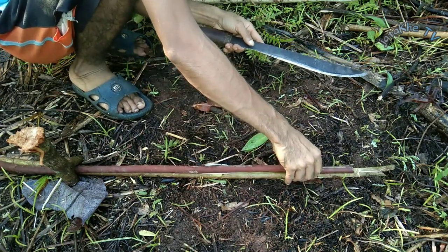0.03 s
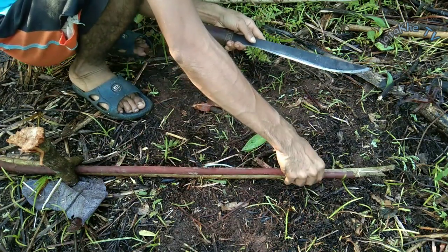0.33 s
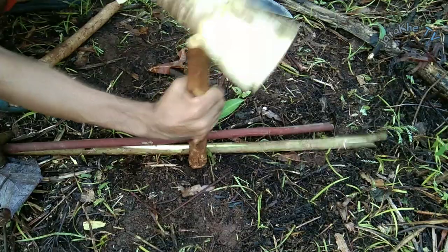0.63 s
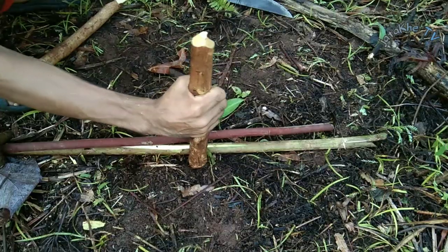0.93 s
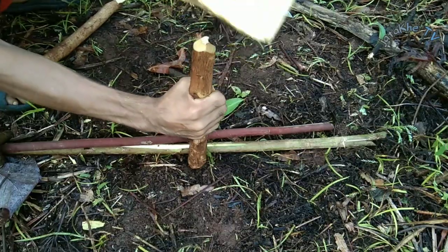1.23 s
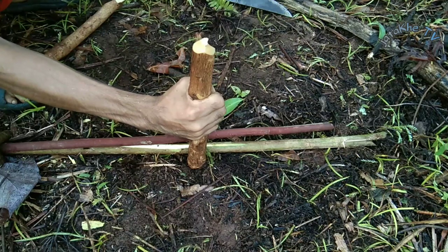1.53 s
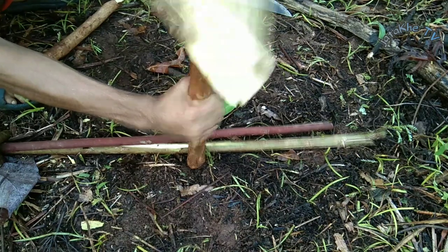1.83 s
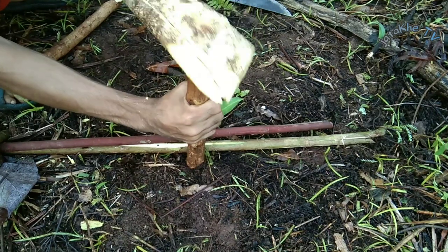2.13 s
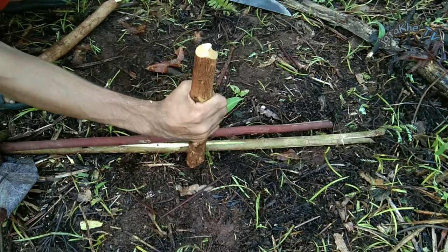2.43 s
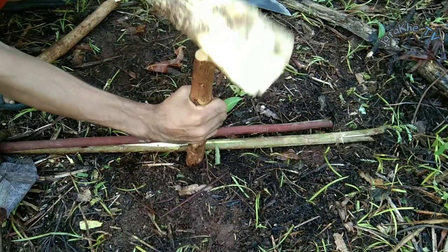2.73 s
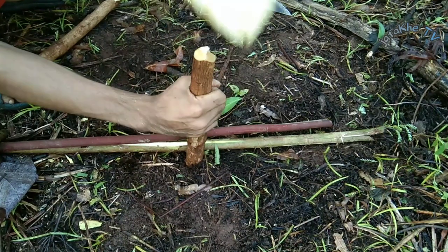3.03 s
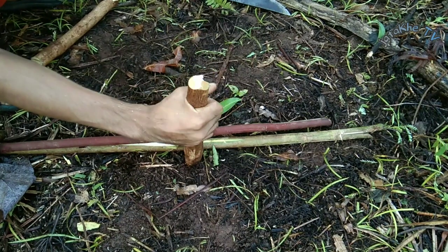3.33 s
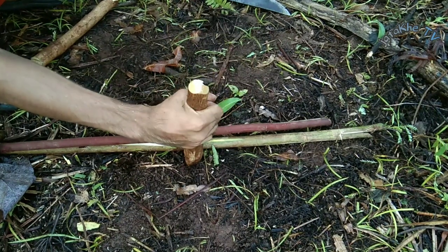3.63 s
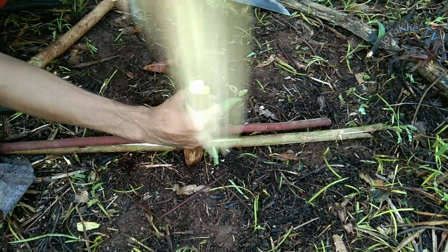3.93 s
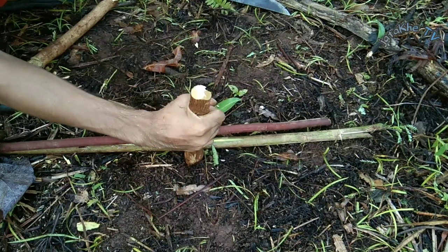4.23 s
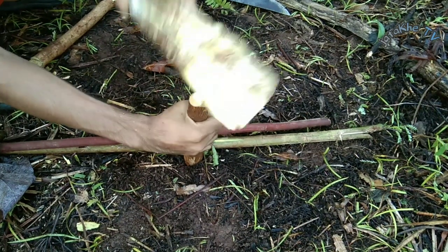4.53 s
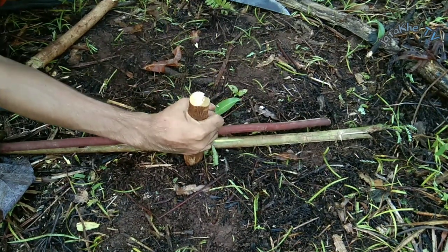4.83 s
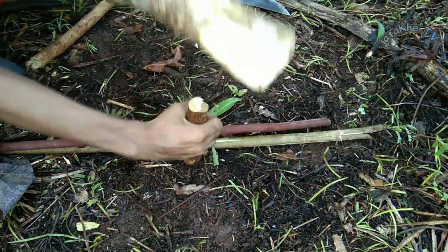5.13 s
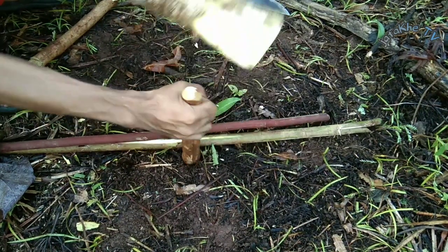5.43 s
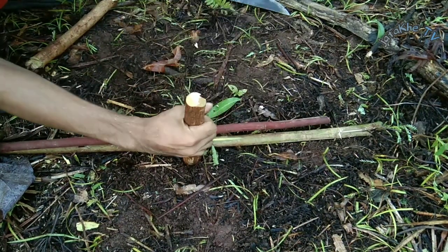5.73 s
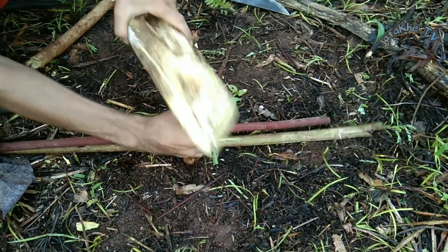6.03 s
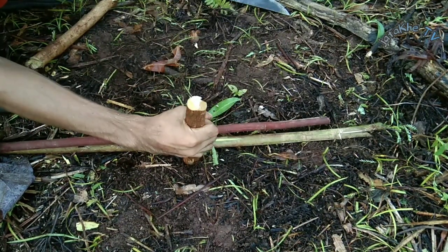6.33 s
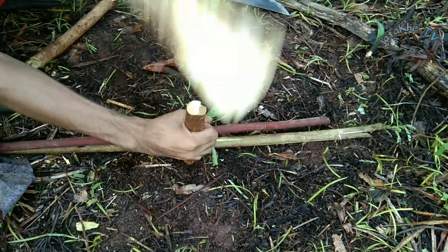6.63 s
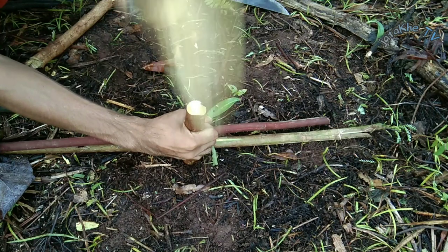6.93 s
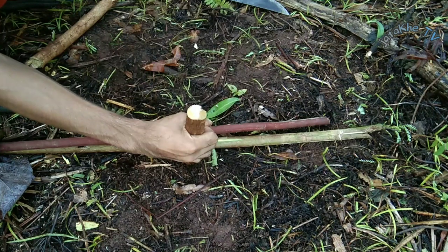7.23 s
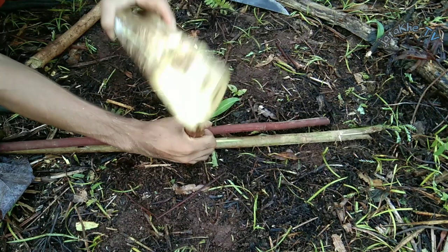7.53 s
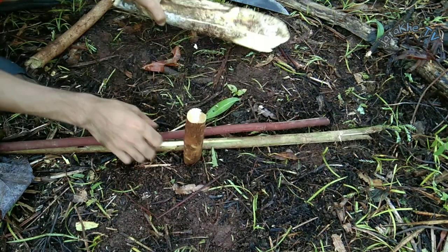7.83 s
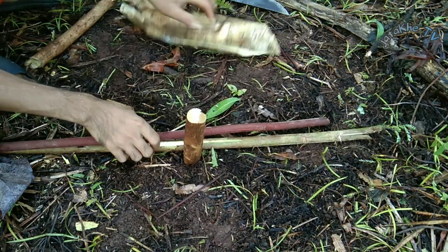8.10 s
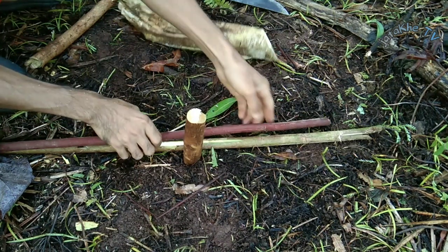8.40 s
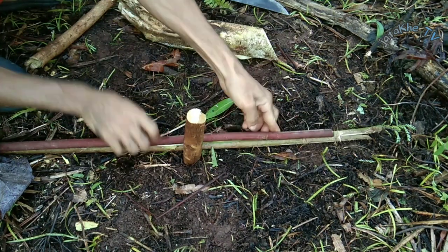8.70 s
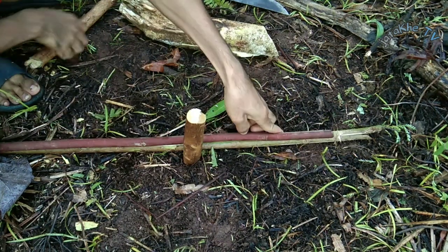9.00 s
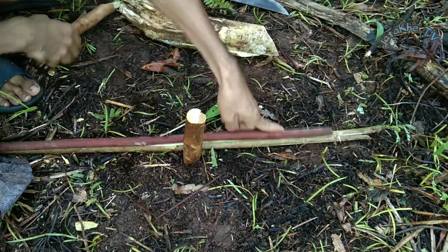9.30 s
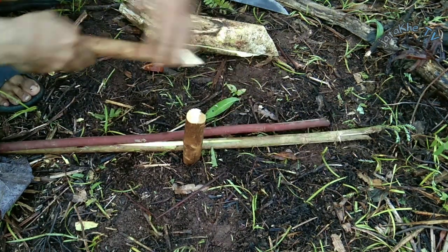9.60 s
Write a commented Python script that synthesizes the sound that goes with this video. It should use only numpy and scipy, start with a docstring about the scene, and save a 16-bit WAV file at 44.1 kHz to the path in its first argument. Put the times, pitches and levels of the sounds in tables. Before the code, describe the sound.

Crickets chirr softly in still outdoor air and a few far birds whistle. Close by, a heavy piece of wood strikes a wooden stake, each blow a crisp knock with a dull thud and a brief echo. Four spaced blows lead into two quicker runs of four. The hammering stops, leaving faint bird calls, a short high trill and a light clack of sticks on the ground.

```python
"""Crickets chirp and rasp by wing strokes at a forest edge; a few birds whistle and sticks are nudged.
Then a heavy billet of wood drives a hand-held stake into damp soil. Each impact thuds through the
ground, excites the billet's modes and cracks fibres off the stake's top; three times, early on, the
billet drops back softly. The stake grips and the blows go on. After the last, far birds chatter,
an insect pips, and the billet and some sticks are moved on the ground."""
import sys
import numpy as np
from scipy import signal
from scipy.fft import rfft, irfft, next_fast_len
from scipy.io import wavfile
from scipy.ndimage import map_coordinates

SR = 44100
rng = np.random.default_rng(int(sys.argv[2]) if len(sys.argv) > 2 else 0)


def wav_out(sig):
    """Save sig, one row per channel (or a flat mono array), as 16-bit PCM at SR to the path in sys.argv[1]."""
    wavfile.write(sys.argv[1], SR, np.round(np.clip(np.atleast_2d(sig).T, -1, 1) * 32767).astype(np.int16))


N = 426006
T = np.arange(N) / SR

# still forest air: frequency_hz, density_db
AIR_SPECTRUM = [(25, -11.5), (60, -6), (110, -3.5), (200, -8.5), (450, -13.5), (1000, -16.5), (3500, -20.5),
                (9000, -19.5), (10000, -14.5), (11500, -23.5), (16000, -25.5)]
# kinds of distant cricket: pitch_hz, width_hz, level_db, flicker_db
CHORUS_BANDS = [(6160, 68, -86.5, 4), (6490, 110, -77.5, 6.5), (6950, 310, -80, 1.5), (7140, 92, -75, 3.5),
                (7607, 160, -77, 8.5), (6900, 1800, -79.5, 0), (9930, 990, -88, 2.5)]
# bouts of the bush crickets: start_s, end_s, level_db
RASP_BOUTS = [(-.1, .636, -66), (.656, 1.14, -79.5), (1.71, 3.097, -76), (3.374, 4.51, -77),
              (4.671, 5.98, -76), (5.983, 6.7, -82.5), (6.987, 8.49, -73.5), (9.031, 9.45, -80.5),
              (9.46, 9.8, -69)]
# the three nearest crickets: pitch_hz
CRICKET_PITCHES = [6080, 6470, 7635]
# their chirps: length_s, rate_hz, level_db
CRICKET_SONGS = [(.07, 13, -72), (.085, 8.2, -68), (0.026, 5.3, -66)]
# their phrases, one list per cricket: start_s, end_s
CRICKET_PHRASES = [
    [(.38, 1.45), (2.3, 3.6), (5.2, 5.55), (8.31, 8.48), (8.82, 9.1)],
    [(.68, 1.7), (2.0, 2.8), (3.15, 8.0), (8.35, 9.1), (9.38, 9.66)],
    [(0, 1.6), (2.05, 11)],
]
# single bird whistles: start_s, pitch_hz, level_db
BIRD_WHISTLES = [(0, 3340, -67.5), (.09, 2510, -69), (.2, 2355, -70.5), (.68, 3080, -83),
                 (1.057, 2120, -75), (2.64, 3010, -76), (4.95, 2500, -77), (7.49, 3030, -74.5),
                 (7.88, 3040, -78.5), (7.96, 1993, -74), (8.129, 1880, -78), (8.29, 2780, -79)]
# thin, high bird trills: start_s, pitch_hz, level_db
BIRD_TRILLS = [(5.52, 5535, -67), (8.177, 8470, -50), (8.525, 7860, -67)]

# dull bumps on the soil: start_s, length_s, level_db
SOIL_THUDS = [(.05, 1, -79.5), (.531, 0.049, -71.5), (8.045, .13, -62.5)]
# sticks knocking together, or the loose stake against the poles: start_s, length_s, level_db
STICK_CLACKS = [(0.536, 0.049, -86.5), (1.513, .07, -69.5), (2.292, 0.089, -66), (3.035, .07, -65),
                (8.051, .08, -76), (9.476, 0.043, -64.5), (9.504, 0.082, -67)]
# dry litter snapping: start_s, length_s, level_db
LITTER_TICKS = [(1.039, 0.015, -53), (5.562, .05, -84)]
# spectra of thud, clack and tick: frequency_hz, density_db
THUD_SPECTRUM = [(40, 2), (90, 3), (170, -9), (300, -16), (600, -32), (1500, -55)]
CLACK_SPECTRUM = [(90, -20), (200, 6), (300, 16), (420, 2), (600, -8), (1000, -0.5), (1400, -5),
                  (2050, 4.5), (2600, -15), (3200, 3), (4100, -26), (5400, -10), (9000, -21)]
TICK_SPECTRUM = [(2500, -15), (5500, -18), (8500, 4), (11000, -10), (15000, -16)]
# modes of the hollow poles lying against the stake: pitch_hz, gain_db, t60_s
POLE_MODES = [(316.4, -1, .2), (2070, -3, 0.2), (3030, -3, 0.21), (3720, -10, 0.26)]

# billet on stake: start_s, force_db, brightness_db, knock_db
IMPACTS = [(0.7894, 0, -2, -15.5), (1.2315, -0.5, -3, 12), (1.512, -8.5, -47, 19.5), (2.0149, -2, 1.5, 3),
           (2.292, -6, -33.5, 25), (2.7914, 1.5, 2, 9), (3.0348, -6.5, -34, -8.5), (3.6304, 1, 2.5, -1.5),
           (4.131, 1, 0.5, -1.5), (4.6217, 1, 2.5, 3), (5.1298, -1, 3, 4.5), (6.198, 0, -1.5, -5.5),
           (6.6761, 0, -1, 1.5), (7.148, 0, -1, -1), (7.6141, 2.5, -4, 4)]
# registers of soil, stake thump, hollow knock, billet ring and crack: low_hz, high_hz
REGISTER_BANDS = [(100, 180), (200, 680), (720, 1100), (1150, 2200), (2400, 16000)]
# each register's response with a loose or firm stake: loose_db, firm_db, brightness_share
REGISTER_RESPONSE = [(-41.5, -35, -.15), (-25, -25, 0), (-28, -27, .3), (-30, -22, 0.52), (-24, -24, 1)]
# modes of soil, stake and billet together: pitch_hz, gain_db, t60_s
IMPACT_MODES = [(92.88, 6.5, .06), (200, -3.5, .028), (345, 7, 0.02), (450, 12, 0.022), (630, 11, .015),
                (858, 3.5, 0.05), (867, 14, 0.01), (1270, 10.5, 0.0094), (1640, 10, .026),
                (1700, 0.5, 0.013), (1705, -26.5, 0.28), (2020, -5, 0.037), (2330, -4.5, .022),
                (2750, -9.5, 0.036), (3470, -10, .018), (4600, -4.5, 0.0053), (7400, -5, 0.01),
                (8530, -0.5, .018)]
# fibres crushed at the contact: frequency_hz, density_db
CRACK_SPECTRUM = [(300, -25.5), (1000, 2.5), (2000, 4), (3100, -3), (4500, 3), (5700, -6), (7800, -0.5),
                  (9000, -10), (10500, -14.5), (15500, -33.5)]
# scattering of a blow by the nearby ground and by the trees: frequency_hz, gain_db
GROUND_SCATTER = [(40, -14.5), (90, -3), (300, -15.5), (700, -13.5), (880, -9), (1100, -15), (1450, -13.5),
                  (1660, -7), (2000, -15.5), (3200, -10), (5500, -8), (7500, -1), (10000, -14),
                  (15500, -32)]
TREE_SCATTER = [(40, -15), (90, 1.5), (170, -8.5), (300, -10.5), (600, -8.5), (880, -8), (1300, -8.5),
                (1700, -4), (2300, -6.5), (3300, -8), (5500, 1), (7500, 3), (10000, -12), (15500, -33.5)]
# an insect's short pips: start_s, level_db
INSECT_PIPS = [(8.88, -62), (8.968, -53.5), (9.158, -55.5)]


def from_db(db):
    """Amplitude grows tenfold for every 20 dB."""
    return 10 ** (np.asarray(db) / 20)


def add(out, start_s, sound):
    """Superposition: a sound adds to the track from its start time on."""
    i = min(max(0, round(start_s * SR)), N)
    out[i:i + len(sound)] += sound[:N - i]


def coloured(x, spectrum):
    """Spectral shaping: gains interpolated over log frequency filter a signal; rms 1."""
    size = next_fast_len(len(x))
    hz, db = np.transpose(spectrum)
    bin_hz = np.maximum(np.fft.rfftfreq(size, 1 / SR), 1)
    gain = from_db(np.interp(np.log(bin_hz), np.log(hz), db))
    shaped = irfft(rfft(x, size) * gain, size)[:len(x)]
    return shaped / np.sqrt(np.mean(shaped ** 2) + 1e-20)


def drift(rate_hz, size=N):
    """Slow random modulation: a spline joins normal values drawn at the given rate."""
    steps = np.arange(size) / SR * rate_hz
    knots = rng.standard_normal(int(steps[-1]) + 4)
    return map_coordinates(knots, [steps + 1], order=2, mode="nearest")


def soft_onset(t, rise_s):
    """A finite rise time: amplitude builds smoothly from 0 to 1."""
    return 1 - np.exp(-(t / rise_s) ** 2)


def still_air(level_db=-86.5):
    """Broadband noise, densest in the bass, forms a steady floor."""
    return from_db(level_db) * coloured(rng.standard_normal(N), AIR_SPECTRUM)


def voices(hz, width_hz):
    """Incoherent addition: many insects on one pitch give a tone of random amplitude and phase."""
    phase = 2 * np.pi * hz * T
    return drift(width_hz) * np.cos(phase) + drift(width_hz) * np.sin(phase)


def far_crickets():
    """Each kind of cricket merges into a narrow band of noise whose level flickers."""
    return sum(from_db(db + flicker_db * drift(26)) * voices(hz, width_hz)
               for hz, width_hz, db, flicker_db in CHORUS_BANDS)


def bush_crickets(edge_s=0.022, wing_hz=118, depth=0.14, floor_db=-94, flutter_db=3.5):
    """Stridulation: fast wing strokes modulate broad rasps that come in bouts and flutter."""
    singing = sum(from_db(db) * (np.tanh((T - start) / edge_s) - np.tanh((T - end) / edge_s)) / 2
                  for start, end, db in RASP_BOUTS)
    upper = from_db(floor_db) + singing
    lower = from_db(-5) * upper
    strokes = 1 + depth * np.sin(2 * np.pi * np.cumsum(wing_hz + 6 * drift(4.2)) / SR)
    rasps = [lower * voices(hz=4307, width_hz=290) / 2, lower * voices(hz=4560, width_hz=350),
             upper * voices(hz=4890, width_hz=230), upper * voices(hz=5217, width_hz=300)]
    return strokes * sum(rasp * from_db(flutter_db * drift(22) - 1.5) for rasp in rasps)


def note(hz, length_s, sag, warble, warble_hz=160):
    """Frequency modulation: a tone swells and fades, sagging and warbling by shares of its pitch."""
    progress = np.linspace(0, 1, int(length_s * SR))
    pitch_hz = hz * (1 - sag * progress + warble * drift(warble_hz, size=len(progress)))
    return np.sin(np.pi * progress) * np.sin(2 * np.pi * np.cumsum(pitch_hz) / SR)


def near_crickets(wing_hz=48, depth=0.24, uneven_db=1.5, stumble=.2):
    """Amplitude modulation: wing strokes pulse a nearly pure tone in loosely timed chirps."""
    out = np.zeros(N)
    for hz, (length_s, rate_hz, db), phrases in zip(CRICKET_PITCHES, CRICKET_SONGS, CRICKET_PHRASES):
        for start_s, end_s in phrases:
            for beat_s in np.arange(start_s, end_s - length_s, 1 / rate_hz):
                late, louder, phase = rng.standard_normal(3)
                chirp = note(hz, length_s, sag=0, warble=0.0062, warble_hz=83)
                strokes = 1 + depth * np.sin(2 * np.pi * (wing_hz * T[:len(chirp)] + phase))
                gain = from_db(db + uneven_db * louder)
                add(out, beat_s + stumble * late / rate_hz, gain * strokes * chirp)
    return out


def birds(series_start_s=6.875, step_s=.261, series_hz=2435, peak_s=8.3, peak_db=-69, fade_db_per_s=8.5):
    """Gliding tones: falling whistles, single or in a series that swells and fades, and high trills."""
    out = np.zeros(N)
    beats_s = series_start_s + step_s * np.arange(10)
    series = [(s, series_hz, peak_db - fade_db_per_s * abs(s - peak_s)) for s in beats_s]
    for start_s, hz, db in BIRD_WHISTLES + series:
        add(out, start_s, from_db(db) * note(hz, length_s=0.069, sag=0.029, warble=.017))
    for start_s, hz, db in BIRD_TRILLS:
        add(out, start_s, from_db(db) * note(hz, length_s=.13, sag=.005, warble=0.031))
    return out


def forest_reverb(x, t60_s, rise_s):
    """Reverberation among trees: a call is convolved with decaying noise of unit energy."""
    t = np.arange(int(SR * 2 / 3)) / SR
    tail = rng.standard_normal(len(t)) * soft_onset(t, rise_s) * from_db(-60 * t / t60_s)
    return signal.oaconvolve(x, tail / np.sqrt(np.sum(tail ** 2)))[:N]


def handling(grain_db=4):
    """Brief contacts radiate grainy, decaying noise: thuds, clacks and dry ticks."""
    out, t = np.zeros(N), np.arange(int(SR / 3)) / SR
    kinds = (SOIL_THUDS, THUD_SPECTRUM), (STICK_CLACKS, CLACK_SPECTRUM), (LITTER_TICKS, TICK_SPECTRUM)
    for events, spectrum in kinds:
        for start_s, length_s, db in events:
            grains = from_db(grain_db * drift(230, size=len(t)))
            envelope = from_db(db) * soft_onset(t, rise_s=0.0012) * np.exp(-2 * t / length_s)
            add(out, start_s, envelope * grains * coloured(rng.standard_normal(len(t)), spectrum))
    return out


def poles(coupling_db=-2, uneven_db=2):
    """Free vibration: each clack leaves the hollow poles ringing faintly in their damped modes."""
    out, t = np.zeros(N), np.arange(int(SR / 3)) / SR
    for start_s, _, clack_db in STICK_CLACKS:
        for hz, db, t60_s in POLE_MODES:
            level_db = clack_db + coupling_db + db + uneven_db * rng.standard_normal()
            add(out, start_s, from_db(level_db - 60 * t / t60_s) * np.sin(2 * np.pi * hz * t))
    return out


def blow_levels(force_db, bright_db, knock_db, grip):
    """Excitation: force lifts all registers, hard contact the high ones, grip mainly soil and ring."""
    loose_db, firm_db, share = np.transpose(REGISTER_RESPONSE)
    soil, thump, knock, ring, snap = loose_db + grip * (firm_db - loose_db) + force_db + share * bright_db
    return [soil, thump, knock + knock_db, ring, snap]


def blow(levels_db, grip, hard_contact_s=.00095, soft_contact_s=0.0027, detune=0.017):
    """Modal impact: the push drives low modes; high ones ring and fibres crack as the billet rebounds."""
    t = np.arange(int(SR / 5)) / SR
    slack = 1 - grip  # a loose stake sounds lower and rings less
    rebound_s = .0015 + 0.001 * slack
    pushed, rung = np.zeros((2, len(t)))
    for hz, db, t60_s in IMPACT_MODES:
        drive_db = np.interp(hz, np.ravel(REGISTER_BANDS), np.repeat(levels_db, 2))
        gain = from_db(drive_db + db - 0.4 * rng.standard_normal())
        is_stake, is_billet = 150 < hz < 700, hz > 1100
        pitch_hz = hz * (1 - 0.057 * slack * is_stake) * (1 + detune * rng.standard_normal())
        age_s = np.maximum(t - rebound_s * is_billet, 0)
        decay = from_db(-60 * age_s / (t60_s * (1 - 0.1 * slack)))
        mode = gain * decay * np.cos(2 * np.pi * pitch_hz * age_s)
        if is_billet:
            rung += mode * soft_onset(age_s, rise_s=0.00026)
        else:
            pushed += mode
    # a blow without a crack is a slow contact, whose longer force pulse is a lower low-pass
    crack_db = levels_db[-1]
    contact_s = np.interp(crack_db, [-55, -35], [soft_contact_s, hard_contact_s])
    force = np.sin(np.pi * np.minimum(t / contact_s, 1)) ** 2
    pushed = signal.fftconvolve(pushed, force / force.sum())[:len(t)]
    fibres = crack(np.maximum(t - rebound_s / 2, 0))
    return pushed + rung + from_db(crack_db) * fibres


def crack(t, rise_s=.003, fall_s=0.004, grain_db=0.5, gain_db=-4.5):
    """Fracture: snapping fibres merge into a short burst of broadband noise."""
    snaps = rng.standard_normal(len(t)) * from_db(grain_db * drift(2500, size=len(t)))
    burst = coloured(snaps, CRACK_SPECTRUM) * soft_onset(t, rise_s) * np.exp(-t / fall_s)
    rms_over_30_ms = np.sqrt(np.sum(burst ** 2) / (.03 * SR))
    return from_db(gain_db) * burst / rms_over_30_ms


def soil_rebound(soil_db, start_hz=108, end_hz=70, sink_s=.018, rise_s=.013, t60_s=0.081, gain_db=7):
    """Elastic recovery: the soil springs back in a damped wave whose pitch sinks as it settles."""
    t = np.arange(int(SR / 4)) / SR
    pitch_hz = end_hz + (start_hz - end_hz) * np.exp(-t / sink_s)
    envelope = from_db(soil_db + gain_db - 60 * t / t60_s) * soft_onset(t, rise_s)
    return envelope * np.cos(2 * np.pi * np.cumsum(pitch_hz) / SR)


def echoes(levels_db, scatter, t60_s, rise_s, gain_db):
    """Diffuse scattering: litter, leaves and trunks return a smooth tail in the blow's colour."""
    t = np.arange(int(SR * 2 / 3)) / SR
    log_hz = np.log(np.maximum(np.fft.rfftfreq(len(t), 1 / SR), 1))
    hz, db = np.transpose(scatter)
    density_db = np.array(levels_db) - 10 * np.log10(np.ptp(REGISTER_BANDS, axis=1) / (SR / 2))
    log_centres = np.log(REGISTER_BANDS).mean(axis=1)
    scattered = [0, 1, 3, 4]  # the brief knock is heard only directly
    blow_db = np.interp(log_hz, log_centres[scattered], density_db[scattered])
    colour = from_db(blow_db + np.interp(log_hz, np.log(hz), db) + gain_db)
    tail = irfft(rfft(rng.standard_normal(len(t))) * colour, len(t))
    return tail * soft_onset(t, rise_s) * from_db(-60 * t / t60_s)


def hammering(loose_until_s=3.1, firm_from_s=3.6):
    """Repeated impacts excite wood, soil and echoes; coupling grows as the stake bites firm soil."""
    out = np.zeros(N)
    for start_s, force_db, bright_db, knock_db in IMPACTS:
        grip = np.interp(start_s, [loose_until_s, firm_from_s], [0, 1])
        levels_db = blow_levels(force_db, bright_db, knock_db, grip)
        add(out, start_s, blow(levels_db, grip))
        add(out, start_s, soil_rebound(levels_db[0]))
        add(out, start_s, echoes(levels_db, GROUND_SCATTER, t60_s=0.14, rise_s=0.001, gain_db=0))
        add(out, start_s, echoes(levels_db, TREE_SCATTER, t60_s=0.38, rise_s=0.051, gain_db=-14.5))
    return out


def bird_chatter(count=30, start_s=7.9, end_s=9.1, low_hz=1350, high_hz=3100, glide=0.12, level_db=-82):
    """A random process of falling density: far birds scatter short notes that glide up or down."""
    out = np.zeros(N)
    for when, height, slope in rng.random((count, 3)):
        pitch_hz = low_hz * (high_hz / low_hz) ** height
        call = note(pitch_hz, length_s=.035, sag=glide * (2 * slope - 1), warble=.01)
        add(out, start_s + (end_s - start_s) * when ** 2, from_db(level_db) * call)
    return out


def insect_pips(pitch_hz=7200):
    """Tone bursts: another insect gives a few very short, high notes."""
    out = np.zeros(N)
    for start_s, db in INSECT_PIPS:
        add(out, start_s, from_db(db) * note(pitch_hz, length_s=.02, sag=0, warble=.005))
    return out


def scene():
    """Sources superpose in one channel: work in front, birds and insects behind, still air under all."""
    calls = birds() + bird_chatter()
    calls += from_db(-3.5) * forest_reverb(calls, t60_s=.4, rise_s=.015)
    air = still_air()
    work = hammering() + poles() + handling()
    insects = near_crickets() + insect_pips() + far_crickets() + bush_crickets()
    return (air + insects + calls + work)[None]


def record(dry, low_hz=54, high_hz=16000):
    """Band limiting: the microphone loses the deepest bass, and a steep low-pass cuts the top."""
    bass_cut = signal.sosfilt(signal.butter(3, low_hz, "high", fs=SR, output="sos"), dry)
    return signal.sosfilt(signal.ellip(10, .1, 80, high_hz, fs=SR, output="sos"), bass_cut)


dry = scene()
out = record(dry)
wav_out(out)
```